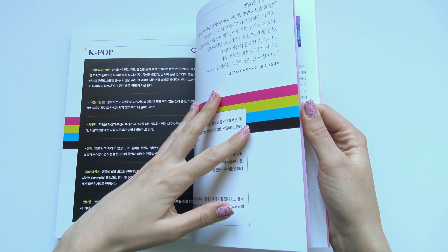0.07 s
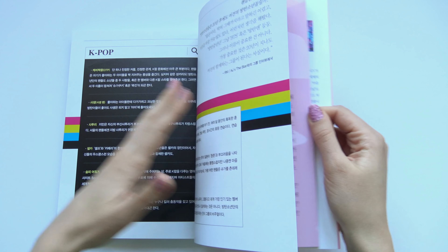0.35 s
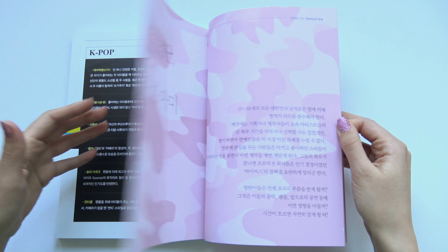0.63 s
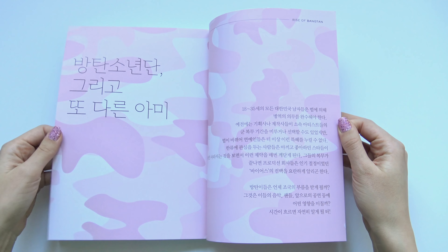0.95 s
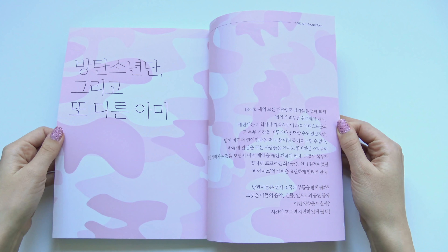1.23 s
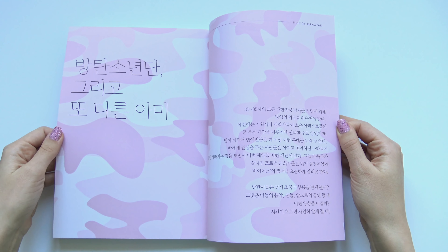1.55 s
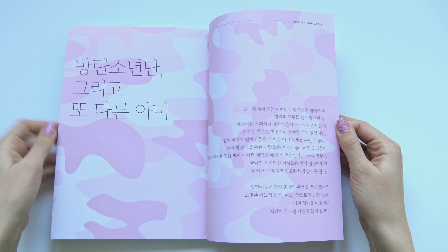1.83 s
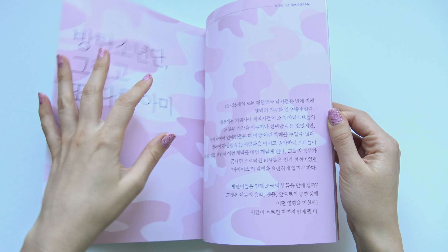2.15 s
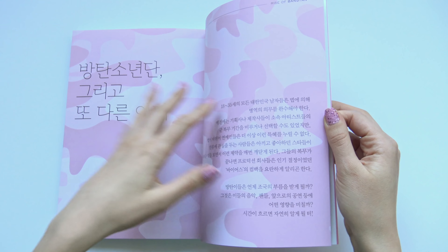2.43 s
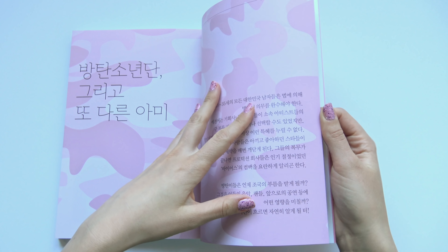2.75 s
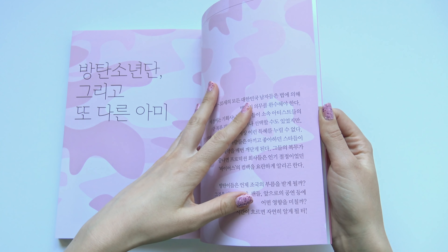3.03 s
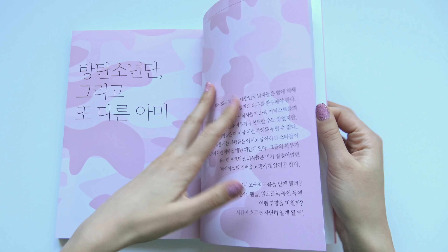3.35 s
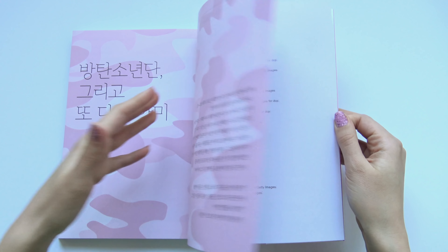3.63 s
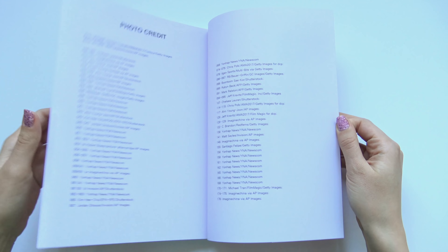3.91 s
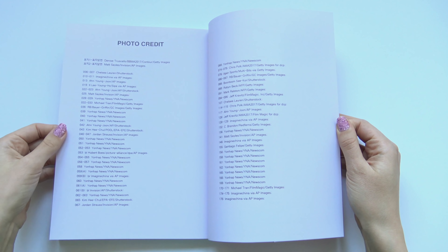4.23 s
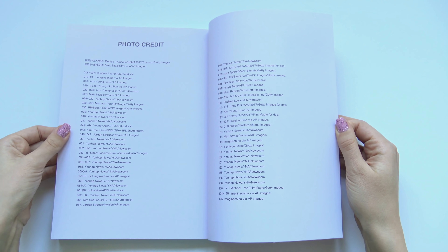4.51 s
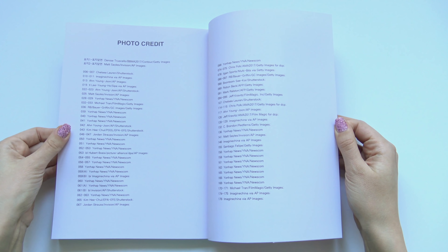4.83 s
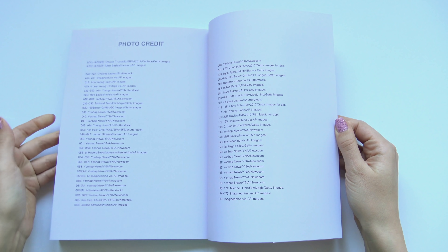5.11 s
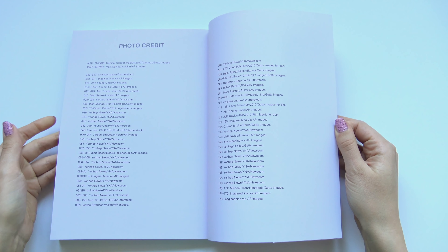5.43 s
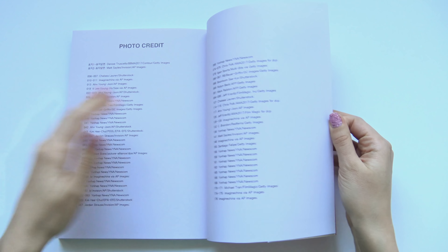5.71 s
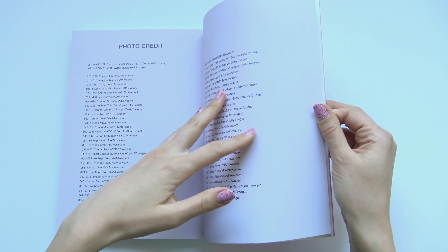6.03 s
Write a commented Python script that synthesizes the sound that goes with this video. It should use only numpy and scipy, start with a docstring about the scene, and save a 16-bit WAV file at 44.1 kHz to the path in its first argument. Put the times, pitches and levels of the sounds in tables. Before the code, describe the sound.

Close up, two pages of a large book are turned one after the other, each with a scraping swish and a soft, airy landing. Between the turns comes a sharp burst of buckling paper, the loudest moment. Afterwards dry hands rub faintly on the pages, fingertips knock on the book, and the paper slides and snaps once more. The room is quiet, with a low steady background and narrow stereo.

```python
"""Paper slides, snaps and settles with a soft puff: two pages of a large book turn in a quiet room.
Friction rings each bowed sheet as it slides over the next; it buckles, snaps free and pushes
air out as it lands. Between turns, dry hands brush the paper and fingertips knock on the book.
Heard from close by, in narrow stereo, over a dull room tone."""
import sys
import numpy as np
from scipy import signal
from scipy.io import wavfile
from scipy.ndimage import uniform_filter1d

SR = 44100
rng = np.random.default_rng(int(sys.argv[2]) if len(sys.argv) > 2 else 0)


def output_pcm(signal):
    """Save a mono or channel-first signal as 16-bit PCM at the path in sys.argv[1].

    Samples are clipped to [-1, 1] before scaling.
    """
    pcm = np.clip(np.atleast_2d(signal).T, -1, 1) * 32767
    wavfile.write(sys.argv[1], SR, np.round(pcm).astype(np.int16))


N = 267246
TIME = np.arange(N) / SR

# paper scrape spectrum (frequency [Hz], level [dB])
SCRAPE_SPECTRUM = [(60, -20), (300, -20), (700, -12), (1200, 2), (2000, 1.5), (3200, 4), (4500, -3),
                   (7000, -13.5), (16000, -48)]
# book body spectrum (frequency [Hz], level [dB])
BODY_SPECTRUM = [(40, -5), (130, -11), (300, -19.5), (450, -4), (600, 0), (760, -3.5), (860, -5.5),
                 (1050, -33), (2000, -40), (8000, -66)]


def gain_of(db):
    """Decibels to amplitude."""
    return 10 ** (np.asarray(db) / 20)


def unit_rms(x):
    """Scale to rms 1."""
    return x / np.sqrt(np.mean(x ** 2) + 1e-20)


def value_at(points, hz):
    """Interpolate on a log-frequency axis."""
    point_hz, value = np.transpose(points)
    return np.interp(np.log(hz + 1e-6), np.log(point_hz), value)


def add(mix, start_s, sound):
    """Mix a sound in at start_s."""
    part = mix[round(start_s * SR):][:len(sound)]
    part += sound[:len(part)]


def colour(x, spectrum, freq_scale=1, size=4096):
    """Minimum-phase filter: attacks stay sharp."""
    hz = abs(np.fft.fftfreq(size, 1 / SR))
    log_gain = np.log(gain_of(value_at(spectrum, hz / freq_scale)))
    taps = np.fft.ifft(np.exp(np.conj(signal.hilbert(log_gain)))).real[:size // 2]
    return signal.oaconvolve(x, taps)[:len(x)]


def resonate(x, hz, width_hz):
    """Two-stage resonance, rms 1; hz may move."""
    carrier = np.exp(2j * np.pi * np.cumsum(hz * np.ones(len(x))) / SR)
    pole = np.exp(-np.pi * width_hz / SR)
    baseband = signal.lfilter([(1 - pole) ** 2], [1, -2 * pole, pole * pole], x / carrier + 1e-18)
    return unit_rms((carrier * baseband).real)


def drift(knots_per_s):
    """Random wander, rms 1."""
    knots_s = np.arange(0, TIME[-1] + 1, 1 / knots_per_s)
    return unit_rms(np.interp(TIME, knots_s, rng.standard_normal(4096)[:len(knots_s)]))


def stroke_power(start_s, rise_s, hold_s, fall_s, fade_db=-19):
    """A stroke gathers speed, holds from start_s and dies; fade_db down at rise_s and fall_s out."""
    before = np.maximum(start_s - TIME, 0) / rise_s
    after = np.maximum(TIME - start_s - hold_s, 0) / fall_s
    level_db = fade_db * (before ** 1.47 + after ** 0.89)
    return gain_of(np.maximum(level_db, -120)) ** 2


def blend(powers, levels_db, hz=1):
    """Joint amplitude and power-weighted frequency of overlapping strokes."""
    weighted = powers * gain_of(levels_db)[:, None] ** 2
    total = weighted.sum(0)
    return np.sqrt(total), (weighted * hz).sum(0) / total


def friction(grains_per_s, spread_db, grain_share):
    """Fibres catch and let go: uneven clicks over a smooth rush."""
    sizes = gain_of(spread_db * np.minimum(rng.exponential(1, N), 4)) * rng.choice([-1, 1], N)
    grains = unit_rms(sizes * (rng.random(N) < grains_per_s / SR))
    return np.sqrt(grain_share) * grains + np.sqrt(1 - grain_share) * rng.standard_normal(N)


def shifting_contact(x, depth_db=1.5):
    """The contact shifts: the colour varies in patches of about 1 kHz by 25 ms."""
    spectra = signal.stft(x, nperseg=256)[2]
    patches = rng.standard_normal(spectra.shape[::-1]).T
    patches = unit_rms(uniform_filter1d(uniform_filter1d(patches, size=6, axis=0), size=9, axis=1))
    return signal.istft(spectra * gain_of(depth_db * patches), nperseg=256)[1][:N]


def room_tone(rush_db=-60.5):
    """Dull rush, thin hiss and a few faint wavering tones."""
    # rush spectrum (frequency [Hz], level [dB])
    rush_spectrum = [(20, -19), (50, 3.5), (100, -0.5), (200, -1.5), (320, -7), (600, -2), (850, -2),
                     (1120, 0.5), (1500, -9.5), (2200, -13.5), (2750, -12), (3000, -10), (3400, -14.5),
                     (15800, -19)]
    # room tones (frequency [Hz], level [dB])
    tones = [(48.4, -81), (118, -79), (646, -77.5), (786, -78.5), (856, -74.5), (1098, -74.5)]
    rush = unit_rms(colour(rng.standard_normal(N), rush_spectrum))
    hum = sum(gain_of(db) * resonate(rng.standard_normal(N), hz, width_hz=9) for hz, db in tones)
    return gain_of(rush_db + 0.21 * drift(6.7)) * rush + hum


def room(x, early_db, tail_db, echoes=8):
    """Add quick reflections off table and book, and a tail that dies faster in the treble."""
    # room decay (frequency [Hz], t60 [s])
    decay = [(150, 0.78), (500, 0.7), (1500, 0.49), (4000, 0.56), (12000, 0.32)]
    # wall return (frequency [Hz], gain [dB])
    walls = [(300, 3.5), (900, -2), (2000, -3.0), (12000, -1.5)]
    early = np.zeros(SR // 2)
    signs = rng.choice([-1, 1], echoes)
    delays_s = rng.uniform(0.001, 0.012, echoes)
    early[(SR * delays_s).astype(int)] = signs / np.sqrt(echoes)
    hz, t, spectra = signal.stft(rng.standard_normal(SR // 2), SR, nperseg=256)
    spectra *= gain_of(-60 * t / value_at(decay, hz)[:, None]) * np.minimum(t / 0.0047, 1)
    spectra *= gain_of(value_at(walls, hz))[:, None]
    tail = signal.istft(spectra, SR, nperseg=256)[1][:SR // 2]
    response = gain_of(early_db) * early + gain_of(tail_db) * tail / np.linalg.norm(tail)
    return x + signal.fftconvolve(x, response)[:N]


def stereo_pair(mid, side_noise_db=-72.5):
    """Two close microphones get slightly different reflections, room noise, level and tone."""
    # reflections into the side signal (frequency [Hz], gain [dB])
    width = [(30, -16), (120, -15), (300, -12), (700, -24), (1400, -10), (2500, -19), (6000, -27),
             (14000, -36)]
    # side room noise (frequency [Hz], level [dB])
    side_spectrum = [(20, -14), (100, 4), (220, 6.5), (400, 2), (1100, 4.5), (2200, -27.5), (4500, -24),
                     (8000, -6), (15000, -58)]
    # hand position (time [s], left minus right [dB])
    position = [(0, -1.3), (.6, -0.5), (1, 0.7), (2.1, 0.14), (2.7, -.7), (3.2, -0.7), (3.6, -0.9),
                (4.05, 0.4), (5.6, 1), (5.95, -0.5)]
    # microphone placement (frequency [Hz], left minus right [dB])
    tone_lean = [(60, .6), (130, 0.6), (300, 3), (480, -.3), (700, -1.8), (1300, -0.7), (2500, 0.05),
                 (9000, -0.4)]
    side = colour(room(mid, early_db=-11, tail_db=-34) - mid, width)
    side += gain_of(side_noise_db) * unit_rms(colour(rng.standard_normal(N), side_spectrum))
    pan_db = np.interp(TIME, *np.transpose(position))
    panned_band = signal.lfilter(*signal.butter(1, 2500, fs=SR), mid)  # treble stays centred
    side += (gain_of(pan_db / 2) - 1) * panned_band
    left = colour(mid, [(hz, db / 2) for hz, db in tone_lean])
    right = colour(mid, [(hz, -db / 2) for hz, db in tone_lean])
    return np.array([left + side, right - side])


def brushing_hands(ring_rel_width=0.1):
    """Dry skin rasps and hisses on paper or table; each rub has a narrow ring, mostly near 3 kHz."""
    # rubs (full speed at [s], rise [s], hold [s], fall [s], rasp [dB], hiss [dB], ring [dB], ring [Hz])
    rubs = [(1.005, 0.065, 0.045, .04, -57, -54.5, -71, 3050),
            (1.053, 0.029, .02, 0.04, -52.5, -59, -50.5, 3030),
            (1.262, .015, .012, .025, -64.5, -70, -75, 3200),
            (1.833, 0.036, .04, 0.066, -57, -57, -55, 3020),
            (1.875, 0.05, 0.048, 0.068, -60.5, -47.5, -64, 2900),
            (1.96, .03, .012, 0.032, -58, -46.5, -58, 2800),
            (3.167, .002, .002, 0.079, -68, -66, -52.5, 9600),
            (4.065, 0.017, 0.032, 0.12, -58, -55.5, -57, 3000),
            (4.185, .025, .02, 0.094, -61, -57, -68, 3000),
            (4.213, .02, 0.024, 0.05, -55.5, -64, -57, 2910),
            (4.332, 0.052, 0.021, .03, -66, -62, -58.5, 1564), (4.43, .05, .025, 0.12, -61, -65, -76, 3020),
            (4.593, 0.067, 0.031, 0.044, -62.5, -71, -67, 3150),
            (4.724, 0.011, 0.017, 0.047, -59.5, -74, -60, 2900),
            (4.846, .008, 0.0074, .015, -60, -70, -68, 3200),
            (5.008, .008, 0.017, .06, -49.5, -62, -54, 3200),
            (5.575, 0.035, 0.032, .022, -59, -53.5, -59, 2870),
            (5.71, 0.033, .02, .06, -69, -62.5, -74, 3000)]
    # skin rasp (frequency [Hz], level [dB])
    rasp_spectrum = [(100, -11.5), (400, -20), (1000, -23), (1600, -8.5), (2300, -9.5), (3000, -4.5),
                     (4500, -11.5), (8000, -15), (16000, -41)]
    # skin hiss (frequency [Hz], level [dB])
    hiss_spectrum = [(2000, -13), (4000, -2.5), (6000, -0.5), (10000, 0), (13000, -6), (15800, -7.5)]
    *timing_s, rasp_db, hiss_db, ring_db, ring_hz = np.transpose(rubs)
    rubbing = np.array([stroke_power(*row) for row in zip(*timing_s)])
    drive = shifting_contact(friction(grains_per_s=4400, spread_db=3.5, grain_share=0.27))
    drive *= gain_of(0.63 * drift(110))
    noise = rng.standard_normal(N)
    ring = sum(np.sqrt(power) * gain_of(db) * resonate(noise, hz, ring_rel_width * hz)
               for power, db, hz in zip(rubbing, ring_db, ring_hz))
    rasp = blend(rubbing, rasp_db)[0] * unit_rms(colour(drive, rasp_spectrum))
    hiss = blend(rubbing, hiss_db)[0] * unit_rms(colour(drive, hiss_spectrum))
    return rasp + hiss + ring


def finger_knock(tick_db, thud_db, thud_hz, t60_s, size=6000):
    """A nail or fingertip hits the book, or a page flaps against it: sharp tick, damped thud."""
    # tick spectrum (frequency [Hz], gain [dB])
    tick_spectrum = [(100, -3), (2000, 5), (3500, 3), (6500, 2.5), (10000, -6), (15000, -25)]
    t = np.arange(size) / SR
    tick = gain_of(tick_db) * colour(np.exp(-t / 0.00005), tick_spectrum)
    thud = gain_of(thud_db - 60 * t / t60_s) * np.sin(2 * np.pi * thud_hz * t)
    return thud - tick


def air_puff(puff_db, swell_s, t60_s, top_hz, push_db, size=22000):
    """A landing sheet or palm squeezes air out: a dull burst over a low push."""
    # puff spectrum (frequency / top_hz [ratio], level [dB])
    puff_spectrum = [(.02, -43), (.06, -29), (.15, -16), (.3, -17), (.5, 0.5), (.95, 0), (1.3, -4.5),
                     (2, -23), (5, -51), (16, -44)]
    # push spectrum (frequency [Hz], level [dB])
    push_spectrum = [(25, -6), (85, -1), (150, -3), (230, 0.5), (400, -25.5), (1500, -29)]
    t = np.arange(size) / SR
    envelope = np.minimum(t / swell_s, 1) * gain_of(-60 * np.maximum(t - swell_s, 0) / t60_s)
    air, weight = envelope * rng.standard_normal((2, size))
    puff = gain_of(puff_db) * unit_rms(colour(air, puff_spectrum, top_hz))
    push = gain_of(push_db) * unit_rms(colour(weight, push_spectrum))
    return (puff + push) * np.sqrt(np.mean(envelope ** 2))  # levels apply at the crest


def sheet_snap(slip_s, sheet_hz, ring_db, hiss_db, hiss_hz, body_db, size=6000):
    """A sheet buckles or slips off a finger, shakes the book and shivers on."""
    # crackle spectrum (frequency / hiss_hz [ratio], level [dB])
    crackle_spectrum = [(.2, -22), (.5, -3.5), (.8, -2), (1, 2), (1.35, -5), (1.7, -8), (2.6, -19),
                        (4, -37)]
    slip_t60_s, shiver_t60_s = 0.013, 0.12
    t = np.arange(size) / SR
    after_s = np.maximum(t - slip_s, 0)
    slip = gain_of(-60 * after_s / slip_t60_s)
    shiver = gain_of(-15 - 60 * after_s / shiver_t60_s)
    rough_noise = rng.standard_normal((3, size)) * gain_of(1.9 * rng.standard_normal(size))
    shake, crackle, shove = rough_noise * np.maximum(slip, shiver)
    scrape = unit_rms(colour(crackle, SCRAPE_SPECTRUM))
    ring = unit_rms(resonate(shake, sheet_hz, width_hz=0.39 * sheet_hz) + gain_of(-10) * scrape)
    hiss = unit_rms(colour(crackle, crackle_spectrum, hiss_hz))
    body = unit_rms(colour(shove, BODY_SPECTRUM))
    sound = gain_of(ring_db) * ring + gain_of(hiss_db) * hiss + gain_of(body_db) * body
    return sound * np.sqrt((slip_s + 0.0011) / t[-1])  # levels apply during the slip


def sliding_sheet(air_fall_ratio=1.58, sink_oct_per_s=1.6, overtone_hz=3380):
    """Friction rings the bowed sheet; the air pocket below sinks in pitch as it opens."""
    # slides (full speed at [s], rise [s], hold [s], fall [s], scrape [dB], edge hiss [dB],
    # air [dB], sheet resonance [Hz], initial pocket resonance [Hz])
    slides = [(0.077, 0.036, .065, 0.054, -53.5, -65, -53, 1650, 950),
              (0.27, 0.068, 0.049, .08, -47.5, -54.5, -54, 1900, 690),
              (0.389, 0.079, 0.032, 0.035, -39.5, -50.5, -46, 1630, 980),
              (0.466, .06, 0.064, .06, -50, -60, -49, 1910, 1000),
              (0.555, 0.03, 0.049, 0.035, -45, -41, -44.5, 1990, 1050),
              (0.594, 0.02, .018, 0.068, -38, -40, -44, 2050, 870),
              (0.663, .04, .025, 0.12, -54.5, -60, -47.5, 2010, 820),
              (2.008, 0.018, 0.081, .04, -47, -45.5, -50.5, 1580, 690),
              (2.077, 0.032, 0.028, .04, -39.5, -38.5, -43, 1480, 790),
              (2.145, 0.017, 0.042, 0.036, -37.5, -45, -44, 1570, 970),
              (2.229, .02, .014, 0.024, -53, -46.5, -66, 1810, 600),
              (2.562, 0.14, 0.24, 0.4, -59, -68.5, -60.5, 1760, 780),
              (2.612, 0.036, 0.039, 0.11, -47, -46, -55.5, 1710, 865),
              (2.969, 0.1, 0.034, .035, -57, -65, -72, 1870, 700),
              (3.143, 0.019, 0.046, 0.13, -56, -63, -59, 1750, 590),
              (3.371, 0.069, 0.042, 0.073, -49, -52, -57, 1900, 930),
              (3.457, 0.036, 0.061, 0.065, -37, -49.5, -46.5, 1480, 1200),
              (3.578, 0.047, 0.034, .18, -45, -53, -47, 1870, 1090),
              (3.693, 0.052, 0.041, 0.064, -55.5, -59, -52.5, 2220, 880),
              (3.81, 0.033, .02, .05, -65.5, -66, -53.5, 2340, 717),
              (5.058, 0.038, 0.034, 0.021, -45.5, -52.5, -53, 1530, 920),
              (5.081, .015, 0.011, 0.11, -47.5, -47.5, -49, 1400, 617),
              (5.883, 0.13, .03, 0.067, -56.5, -68, -53.5, 2400, 610),
              (5.988, 0.028, 0.02, .03, -44.5, -66, -48, 2500, 650),
              (6.037, .015, .015, .05, -47.5, -43.5, -48.5, 2460, 684)]
    # edge hiss (frequency [Hz], level [dB])
    hiss_spectrum = [(1500, -31), (3500, 0), (5000, 3), (6400, 3.5), (7700, 2), (10000, 1.5), (12500, -4.5),
                     (15800, -12)]
    start_s, rise_s, hold_s, fall_s, scrape_db, hiss_db, air_db, ring_hz, open_hz = np.transpose(slides)
    rubbing = np.array([stroke_power(*row) for row in zip(start_s, rise_s, hold_s, fall_s)])
    air_fall_s = fall_s * air_fall_ratio
    flowing = np.array([stroke_power(*row) for row in zip(start_s, rise_s, hold_s, air_fall_s)])
    opening_s = np.clip(TIME - start_s[:, None], 0, 0.5)
    sinking_hz = open_hz[:, None] * np.exp2(-sink_oct_per_s * opening_s)
    scrape_gain, sheet_hz = blend(rubbing, scrape_db, ring_hz[:, None])
    hiss_gain, _ = blend(rubbing, hiss_db)
    air_gain, pocket_hz = blend(flowing, air_db, sinking_hz)

    drive = shifting_contact(friction(grains_per_s=3000, spread_db=3.0, grain_share=0.42))
    drive *= gain_of(drift(140))
    bend_hz = sheet_hz * (1 + 0.11 * drift(30))  # the sheet's curve is never quite still
    ring = resonate(drive, bend_hz, width_hz=470)
    overtone = resonate(drive, overtone_hz, width_hz=770)
    broadband = unit_rms(colour(np.roll(drive, 200), SCRAPE_SPECTRUM))
    scrape = unit_rms(broadband + gain_of(-0.1) * ring + gain_of(-11) * overtone)
    hiss = unit_rms(colour(drive, hiss_spectrum))
    pocket = resonate(rng.standard_normal(N), pocket_hz, width_hz=494)
    air = gain_of(-2.5) * pocket + gain_of(-16) * unit_rms(colour(drive, BODY_SPECTRUM))
    return scrape_gain * scrape + hiss_gain * hiss + air_gain * air


def scene(low_cut_hz=73):
    """Paper and hands, deep bass cut, in the room, in stereo, over the room tone."""
    # snaps (time [s], slip [s], sheet resonance [Hz], ring [dB], hiss [dB], hiss centre [Hz], body [dB])
    snaps = [(0.075, 0.007, 1800, -58, -47.5, 9000, -64), (0.0813, .001, 1780, -45, -38.5, 9500, -55),
             (0.3441, .0019, 4760, -31.5, -41.5, 6500, -37.5), (0.583, 0.0029, 2110, -29.5, -28, 6200, -34),
             (0.9416, 0.00093, 1660, -40, -42, 5750, -41), (2, 0.0062, 1840, -50, -50, 7000, -51.5),
             (2.1069, 0.0034, 1590, -28, -30.5, 9100, -40), (2.112, 0.005, 1570, -18.5, -30, 6650, -41),
             (2.122, 0.013, 1380, -31, -36, 6040, -58), (2.162, .001, 3000, -36, -39, 6000, -41),
             (2.179, 0.0011, 2900, -28.5, -39, 6000, -33), (2.185, .0012, 2680, -28, -29, 6100, -32.5),
             (2.585, 0.0038, 1750, -45, -44.5, 9000, -60), (2.5995, .0016, 1790, -43, -41.5, 9200, -45.5),
             (2.622, 0.018, 1830, -38.5, -54, 7000, -62), (3.1345, .003, 1750, -48, -52, 8000, -60),
             (3.1658, .0006, 1800, -43, -42, 9100, -75), (3.1694, .0018, 1920, -33.5, -31.5, 9400, -45),
             (4.0529, 0.0018, 1750, -50, -43.5, 7040, -41), (4.722, .0072, 2950, -46.5, -51.5, 5400, -73),
             (4.9607, 0.0069, 3040, -42.5, -45.5, 5600, -66),
             (4.9971, 0.0027, 3180, -40.5, -44.5, 5500, -56), (5.029, 0.0034, 1620, -46, -46, 6000, -64),
             (5.0731, 0.0037, 1420, -36, -46, 6000, -49), (5.9135, 0.0022, 2600, -62, -50, 4500, -44),
             (5.938, 0.0027, 2380, -47.5, -55, 4500, -45), (5.9721, .013, 2320, -33, -35.5, 5000, -41.5),
             (6.017, 0.013, 2190, -34.5, -35, 5070, -42.5)]
    # puffs (time [s], level [dB], swell [s], t60 [s], band top [Hz], low push [dB])
    puffs = [(0.082, -42.5, 0.0015, 0.074, 915, -49), (0.664, -53.5, 0.029, 0.75, 87.5, -84),
             (0.952, -37.5, 0.0048, 0.18, 870, -47), (1.02, -47.5, .008, 0.33, 900, -58),
             (1.236, -53, .002, 0.08, 724, -71), (2.113, -31.5, 0.0061, 0.13, 1400, -46),
             (2.19, -42.5, .004, 0.13, 705, -48), (2.266, -34, 0.017, 0.097, 855, -67),
             (2.295, -47, 0.0044, 0.57, 753, -58), (3.172, -48, 0.0022, 0.069, 493, -58),
             (4.056, -38, 0.01, 0.14, 890, -50.5), (4.125, -47, 0.0096, 0.06, 700, -53.5),
             (5.098, -50, 0.0055, 0.057, 700, -67), (5.129, -44, 0.0041, .13, 585, -53),
             (6.022, -56, 0.01, 0.047, 500, -46.5)]
    # knocks, and one page flap at 2.2868 s (time [s], tick [dB], thud [dB], thud [Hz], t60 [s])
    knocks = [(0.9416, -30, -43, 173, 0.053), (1.2375, -54, -46, 614, 0.023),
              (2.2868, -60, -26, 774, 0.017), (2.5986, -46, -39.5, 546, 0.016),
              (4.0515, -22.5, -38.5, 146, 0.059), (5.0722, -22.5, -26, 906, 0.017),
              (5.9138, -36, -34, 600, 0.035), (5.9375, -36, -37, 556, 0.022)]
    paper = sliding_sheet() + brushing_hands()
    for source, events in ((sheet_snap, snaps), (air_puff, puffs), (finger_knock, knocks)):
        for start_s, *settings in events:
            add(paper, start_s, source(*settings))
    low_cut = signal.butter(2, low_cut_hz, "high", fs=SR, output="sos")
    mid = room(signal.sosfilt(low_cut, paper), early_db=-12, tail_db=-17)
    return stereo_pair(mid) + room_tone()


def record(dry, cutoff_hz=15950):
    """Steep low-pass band limit."""
    taps = signal.firwin(511, cutoff_hz, window=("kaiser", 9), fs=SR)
    return signal.oaconvolve(dry, taps[None], "same", axes=1)


dry = scene()
out = record(dry)
output_pcm(out)
```